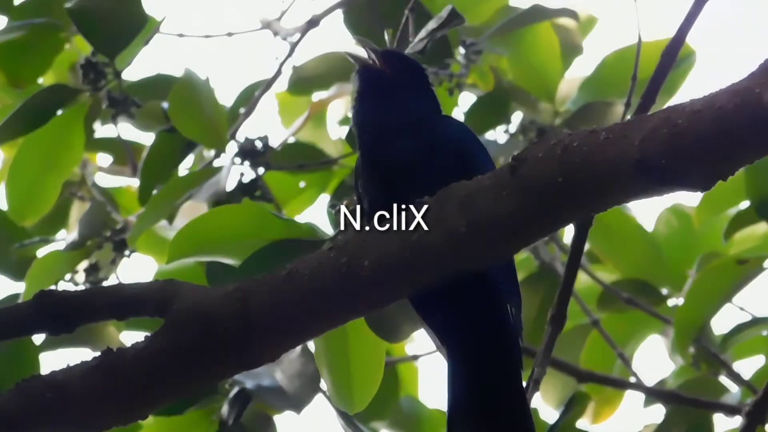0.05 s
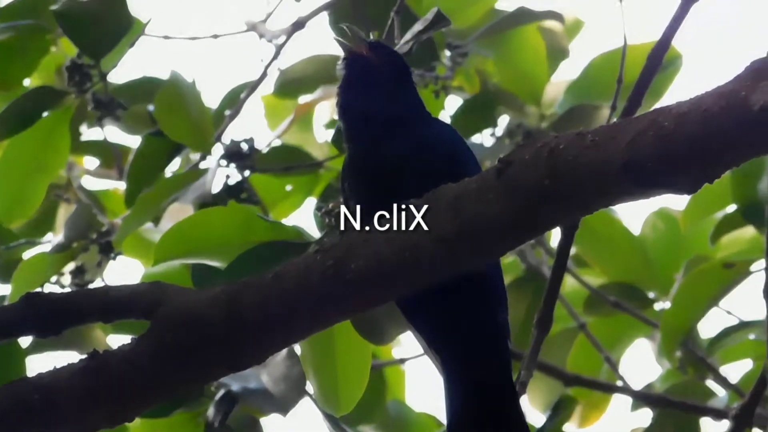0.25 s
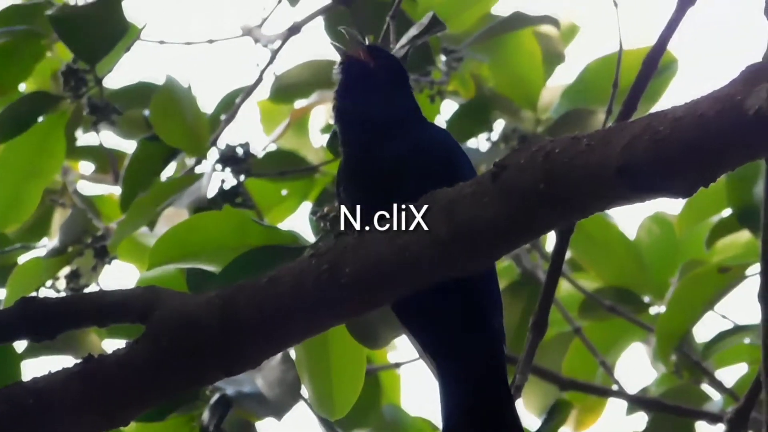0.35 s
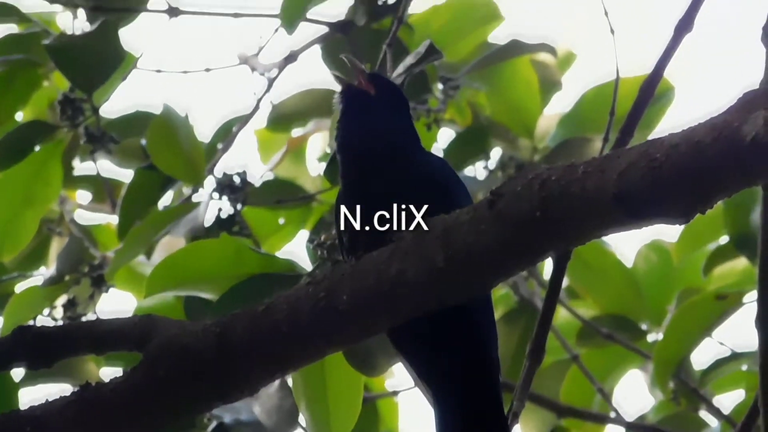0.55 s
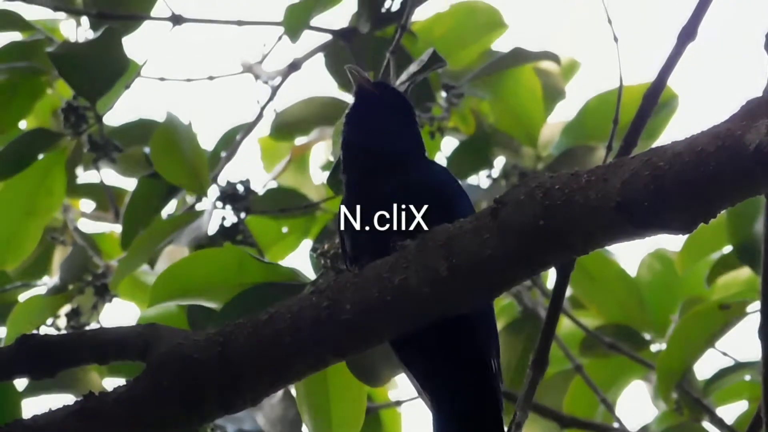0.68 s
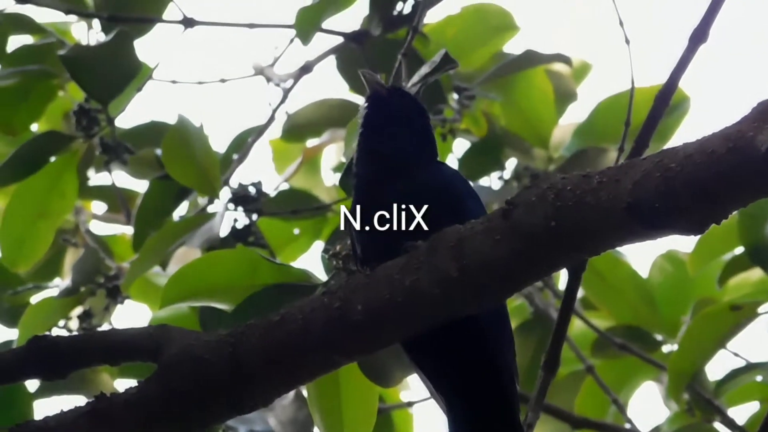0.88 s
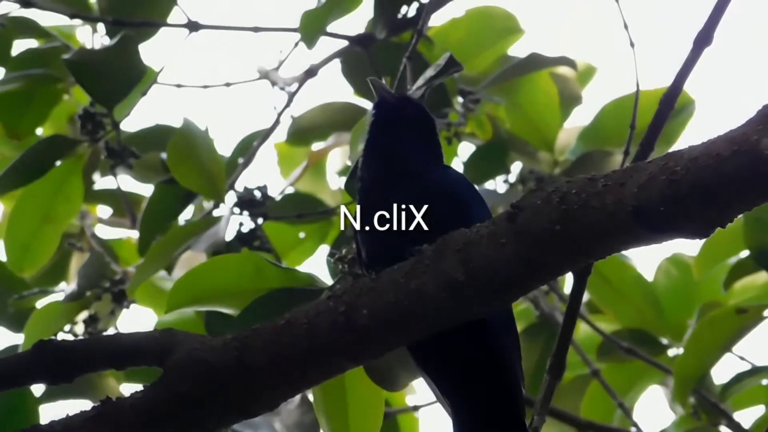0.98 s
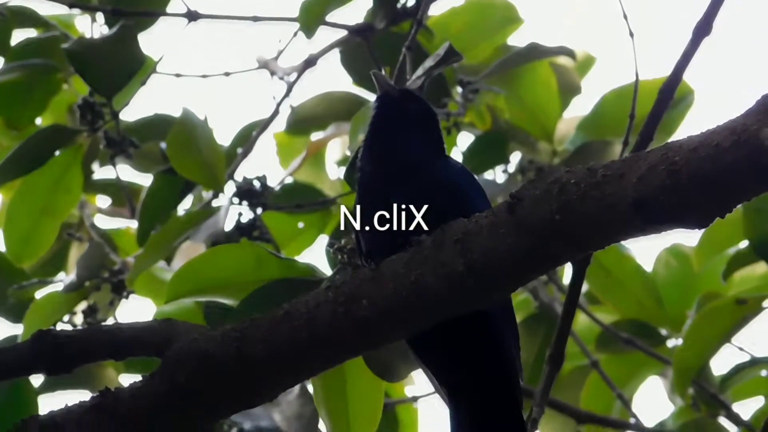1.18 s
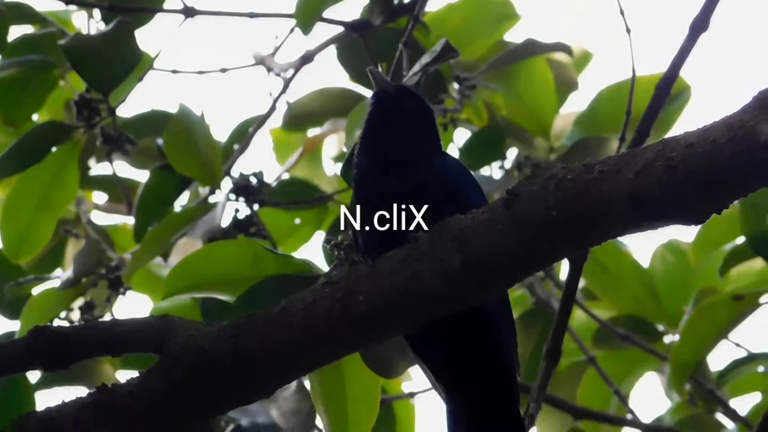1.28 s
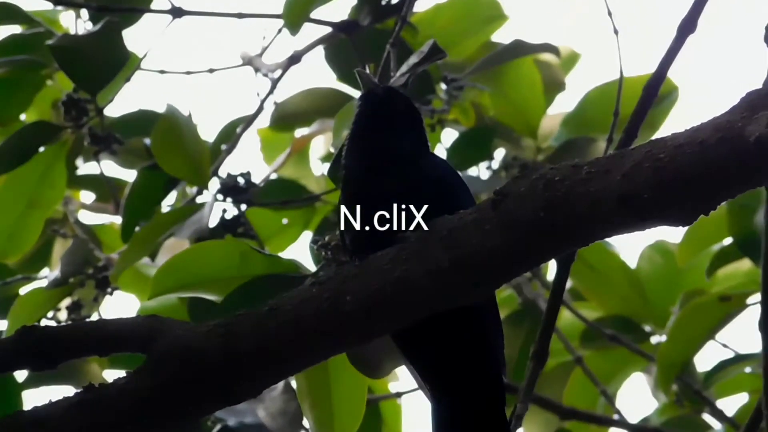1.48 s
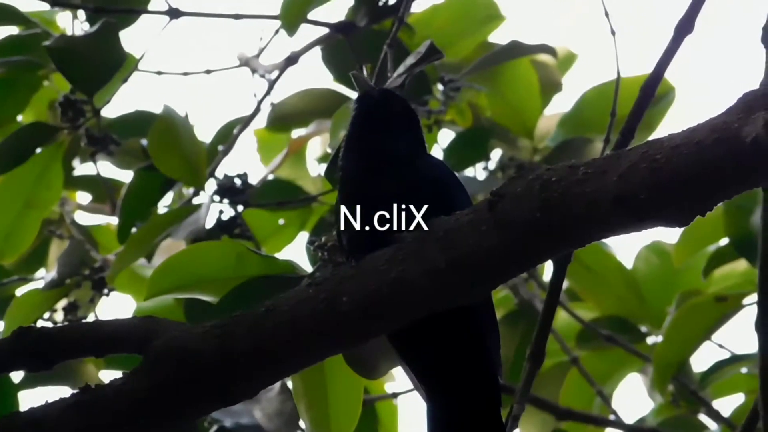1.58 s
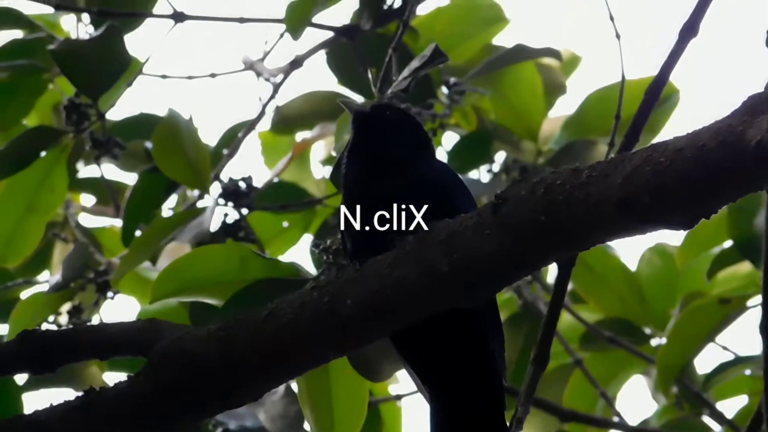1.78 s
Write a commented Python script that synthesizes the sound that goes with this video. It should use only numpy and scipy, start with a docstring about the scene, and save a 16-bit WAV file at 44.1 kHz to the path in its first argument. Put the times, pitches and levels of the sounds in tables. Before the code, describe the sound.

A bird in a tree near the microphone gives one loud whistle: a raspy start, a held note, a swelling rise and a steep fall. It echoes briefly, then faint distant birds call over low outdoor rumble and hiss.

```python
"""A koel on a branch near the microphone gives one loud whistle: a raspy start, a held note,
then a swelling rise and a steep fall. It sits a little right of centre, outdoors among trees.
The ground reflects the call, leaves and trees scatter it into a short tail, and a faint echo
comes back from far off. Other birds call in the distance, over a low rumble and hiss."""
import sys
import numpy as np
from scipy import signal
from scipy.fft import rfft, irfft, next_fast_len
from scipy.io import wavfile
from scipy.ndimage import uniform_filter1d, map_coordinates

SR = 44100
rng = np.random.default_rng(int(sys.argv[2]) if len(sys.argv) > 2 else 0)


def bounce(signal):
    """Save signal as a 16-bit WAV file at the path given by the first command-line argument."""
    frames = np.transpose(np.atleast_2d(signal))
    limited = np.clip(frames, -1, 1)
    pcm = np.round(limited * 32767).astype(np.int16)
    wavfile.write(sys.argv[1], SR, pcm)


N = 81585
t = np.arange(N) / SR


def amp(db):
    """Decibels to gain."""
    return 10 ** (np.asarray(db) / 20)

def unit(x):
    """Scale to rms 1."""
    return x / np.sqrt(np.mean(x ** 2) + 1e-20)

def along(points, hz):
    """Read (f/Hz, value) points on a log axis."""
    f, v = np.transpose(points)
    return np.interp(np.log(hz + 1), np.log(f + 1), v)

def curve(rows):
    """One value per sample from (t/s, value) rows."""
    return np.interp(t, *np.transpose(rows))

def wobble(rate):
    """A smooth random curve, rate knots a second."""
    knots = rng.standard_normal(int(N * rate / SR) + 4)
    return map_coordinates(knots, [t * rate])

def filtered(x, response):
    """Pass x through a frequency response."""
    m = next_fast_len(N + SR // 2)
    return irfft(rfft(x, m) * response(np.fft.rfftfreq(m, 1 / SR)), m)[..., :N]

def coloured(x, spectrum):
    """Shape x by (f/Hz, level/dB) points."""
    return filtered(x, lambda hz: amp(along(spectrum, hz)))

def noise(spectrum):
    """Coloured noise of rms 1."""
    return unit(coloured(rng.standard_normal(N), spectrum))

def pan(db):
    """Channel gains; db is left minus right, so negative leans right."""
    return amp([[db / 2], [-db / 2]])

def scatter(x, t60s, gap_s):
    """A diffuse stereo echo after a gap, dying away by (f/Hz, T60/s) points."""
    hz, age, spectra = signal.stft(rng.standard_normal((2, N)), SR, nperseg=256)
    decay = amp(-60 * age / along(t60s, hz)[:, None])
    tail = signal.istft(spectra * decay, SR, nperseg=256)[1]
    tail = np.pad(tail / np.linalg.norm(tail[0]), ((0, 0), (int(gap_s * SR), 0)))
    return signal.fftconvolve(x[None], tail, axes=1)[:, :N]


# How alike the ambience is on the microphone's two sides: f/Hz, coherence/0-1
COHERENCE = [(40, 1), (120, 0.76), (300, 0.46), (900, 0.76), (2000, 0.12), (10000, 0.067)]
def wide_noise(spectrum):
    """Ambient stereo noise of rms 1, near mono in the bass."""
    def mid_side(hz):
        angle = np.arccos(np.clip(along(COHERENCE, hz), -1, 1)) / 2
        return amp(along(spectrum, hz)) * [np.cos(angle), np.sin(angle)]
    mid, side = filtered(rng.standard_normal((2, N)), mid_side)
    return unit(np.array([mid + side, mid - side]))

# The outdoor bed all around the microphone: f/Hz, relative level/dB
BED_SPECTRUM = [(15, -25), (28, 4.5), (60, -1.5), (112, -1.5), (160, -8.5), (260, -7), (500, -5), (680, -6),
                (1000, -4), (1500, -6.5), (2200, -10), (3400, -15), (4200, -19), (6400, -24), (7300, -14.5),
                (7900, -22), (11000, -24), (15000, -27)]
def outdoor_bed(level_db=-52.5):
    """Steady low rumble and hiss."""
    return amp(level_db) * wide_noise(BED_SPECTRUM)

# Swell of the distant wash: t/s, level/dB
WASH_LEVEL = [(0, -59), (.9, -61), (1.08, -61), (1.15, -52), (1.3, -54.5), (1.38, -59), (1.55, -58.5),
              (1.7, -80), (1.85, -59)]
# Its hollow colour: f/Hz, relative level/dB
WASH_SPECTRUM = [(400, -20), (700, -3.5), (850, 4), (1180, 5.5), (1320, -5), (1480, -52), (2500, -48)]
def distant_wash(flutter_db=2):
    """A faint, fluttering band of far-off sound around 1 kHz."""
    return amp(curve(WASH_LEVEL) + flutter_db * wobble(70)) * wide_noise(WASH_SPECTRUM)

# Decay among the surrounding trees: f/Hz, T60/s
TREE_DECAY = [(200, 0.36), (1300, 0.52), (3000, 0.57), (6000, 0.42), (14000, 0.47)]
def trees(sound):
    """The trees scatter a sound into a half-second tail."""
    return scatter(sound, TREE_DECAY, gap_s=.012)

# Birds far from the microphone: t/s, length/s, start f/Hz, end f/Hz, level/dB
FAR_BIRD_NOTES = [(-.02, 0.11, 3650, 3620, -64), (0.413, 0.098, 1724, 1722, -60),
                  (0.418, 0.0703, 2110, 2060, -57.5), (.85, .04, 3950, 3850, -68),
                  (0.886, .09, 3730, 3638, -61.5), (0.888, 0.081, 860, 887, -51),
                  (0.966, 0.025, 1197, 1100, -47.5), (1.19, .08, 1950, 1920, -61),
                  (1.272, .032, 1204, 1150, -50), (1.44, 0.11, 518, 476, -61.5),
                  (1.487, .23, 3400, 3353, -64.5), (1.529, 0.114, 1650, 1574, -51.5),
                  (1.623, 0.088, 1572, 1520, -59), (1.766, 0.049, 1341, 843, -51),
                  (1.761, 0.0297, 4950, 4480, -64.5), (1.8, 0.027, 4910, 4490, -63)]
def far_birds(waver=0.00988, trees_db=-2):
    """Short gliding notes, blurred by the trees."""
    notes = np.zeros(N)
    for start, length, start_hz, end_hz, db in FAR_BIRD_NOTES:
        progress = np.clip((t - start) / length, 0, 1)
        hz = (start_hz + progress * (end_hz - start_hz)) * (1 + waver * wobble(150))
        notes += amp(db) * np.sin(np.pi * progress) * np.sin(2 * np.pi * np.cumsum(hz) / SR)
    return notes + amp(trees_db) * trees(notes)

def reflection(call, delay_s, db):
    """One bounce reaches the microphone later and weaker than the direct sound."""
    return amp(db) * filtered(call, lambda hz: np.exp(-2j * np.pi * hz * delay_s))

# What the nearest foliage throws back: f/Hz, level/dB
LEAF_SPECTRUM = [(1400, -20.5), (3000, -6), (6000, 2), (12000, 2.5)]
def leaves(call, t60_s=0.079):
    """Close leaves scatter mostly treble, in a very short tail."""
    return scatter(coloured(call, LEAF_SPECTRUM), [(1000, t60_s)], gap_s=.002)

# Noise at the start of the call: f/Hz, relative level/dB
RASP_SPECTRUM = [(400, -50), (850, 10.5), (1200, -25), (1550, 9.5), (2100, -3), (2400, 10), (2800, -16),
                 (6000, -26), (10800, -16), (14000, -40)]
# Overtones that flash in it: multiple, relative level/dB
RASP_OVERTONES = [(2, -3), (8, -12.5)]
def koel_rasp(phase, start_s=0.1594, level_db=-45.5):
    """The call opens with a burst of noise and a bite of overtones locked to the whistle."""
    age = np.maximum(t - start_s, 0)
    def burst(attack_s, t60_s):
        return amp(level_db - 60 * age / t60_s) * np.minimum(age / attack_s, 1)
    rasp = burst(attack_s=0.0051, t60_s=0.17) * noise(RASP_SPECTRUM)
    bite = sum(amp(db) * np.sqrt(2) * np.sin(round(k) * phase) for k, db in RASP_OVERTONES)
    return rasp + burst(attack_s=0.019, t60_s=0.16) * bite

# Overtones against the fundamental: multiple, held-note level/dB, top-of-rise level/dB
WHISTLE_OVERTONES = [(2, -27.5, -32.5), (3, -48, -37), (4, -46, -39), (5, -31.5, -34), (6, -42, -57),
                     (7, -44, -40), (8, -41, -45), (9, -38, -43), (10, -46, -58), (11, -42, -62)]
def koel_tone(hz, phase, held_hz=1210, peak_hz=1460, throat_hz=5640, waver_db=2.5):
    """A near-pure tone; a throat resonance lifts the thin overtones passing through it."""
    rise = np.clip((hz - held_hz) / (peak_hz - held_hz), 0, 1)
    bloom_db = 300 * np.minimum(t - 0.198, 0)  # overtones come in after the fundamental
    dip_db = -22 * np.exp(-((t - 0.371) / 0.026) ** 2)  # the second harmonic drops out briefly
    soften_db = 21 * np.maximum(t - 0.65, 0)  # on the fall, higher overtones fade faster
    tone = np.sin(phase)
    for k, held_db, top_db in WHISTLE_OVERTONES:
        multiple = round(k)
        throat_db = 9.5 * np.exp(-((multiple * hz - throat_hz) / 650) ** 2)
        db = held_db + rise * (top_db - held_db) + throat_db + waver_db * wobble(27.5)
        db += bloom_db + (multiple == 2) * dip_db - multiple * soften_db
        tone += amp(db) * np.sin(multiple * phase)
    return np.sqrt(2) * tone

# Pitch of the koel on its branch: t/s, f/Hz
WHISTLE_PITCH = [(.16, 1195), (.185, 1215), (.22, 1222), (.29, 1239), (.335, 1233), (.385, 1213),
                 (.43, 1228), (.46, 1260), (.49, 1299), (.52, 1353), (.56, 1405), (.585, 1461),
                 (.605, 1460), (.625, 1440), (.65, 1380), (.675, 1300), (.7, 1203), (.735, 1018),
                 (.775, 830)]
# Strength of its whistle: t/s, level/dB
WHISTLE_EFFORT = [(.155, -66), (.178, -43.5), (.205, -36.5), (.25, -34.5), (.31, -34), (.39, -31.5),
                  (.46, -32), (.53, -25.5), (.61, -27), (.655, -25.5), (.7, -34), (.745, -42.5), (.77, -50),
                  (.785, -89)]
# Air noise in the whistle: f/Hz, relative level/dB
BREATH_SPECTRUM = [(300, -39), (850, 18), (1900, -29), (3500, 4), (6000, -12), (11000, 1), (15000, -24)]
def koel(jitter=.001, shimmer_db=0.33, breath_db=-37):
    """The direct call: a rasp, then tone and breath that swell and fade together."""
    hz = uniform_filter1d(curve(WHISTLE_PITCH), size=600) * (1 + jitter * wobble(119.2))
    phase = 2 * np.pi * np.cumsum(hz) / SR
    tone = koel_tone(hz, phase)
    calling = (t > WHISTLE_EFFORT[0][0]) & (t < WHISTLE_EFFORT[-1][0])
    effort = amp(curve(WHISTLE_EFFORT) + shimmer_db * wobble(59.3)) * calling
    rasp = koel_rasp(phase)
    breath = amp(breath_db) * noise(BREATH_SPECTRUM)
    return rasp + effort * (tone + breath)


def scene():
    """At the microphone: the koel and its echoes near and far, over the distant ambience."""
    call = koel()
    ground = reflection(call, delay_s=.009, db=-11)
    far_echo = reflection(call, delay_s=0.18, db=-27.5)
    bright_call = coloured(call, [(1500, 0), (6000, 11)])
    short_tail = leaves(call) + amp(-8) * trees(bright_call)
    long_tail = amp(-20) * scatter(call, t60s=[(1000, 2)], gap_s=0.067)
    foreground = call + ground + far_echo + short_tail + long_tail
    background = distant_wash() + outdoor_bed() + far_birds()
    return pan(-3.5) * foreground + pan(-2) * background

def record(dry, top_hz=15450):
    """The camera keeps nothing above its band limit."""
    return filtered(dry, lambda hz: hz < top_hz)


dry = scene()
out = record(dry)
bounce(out)
```